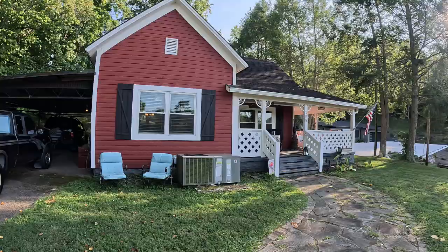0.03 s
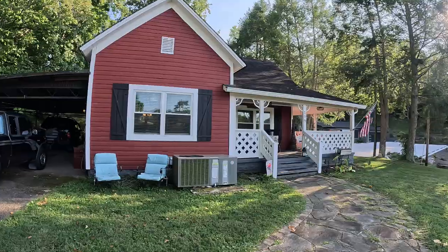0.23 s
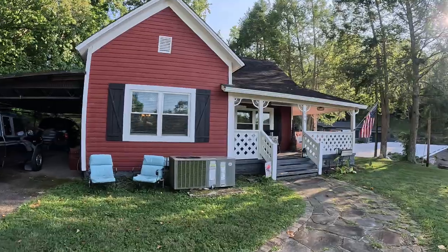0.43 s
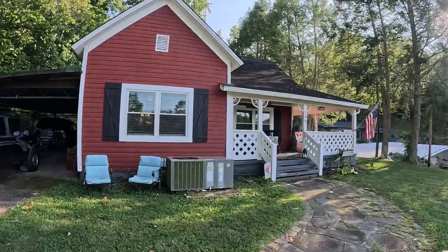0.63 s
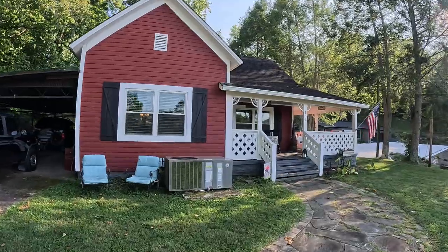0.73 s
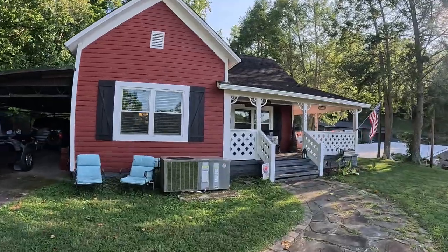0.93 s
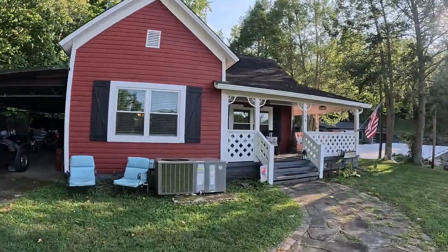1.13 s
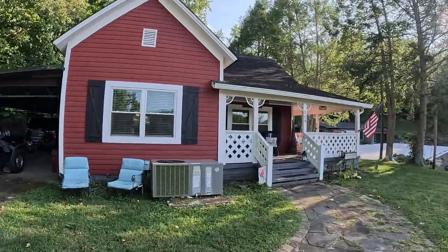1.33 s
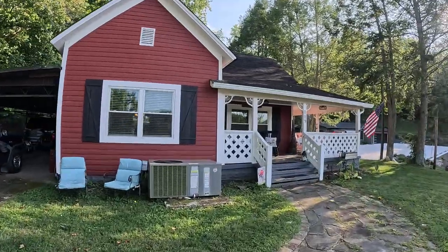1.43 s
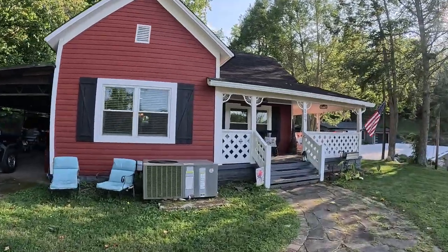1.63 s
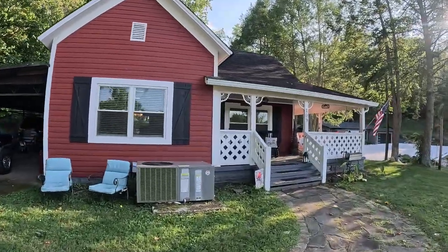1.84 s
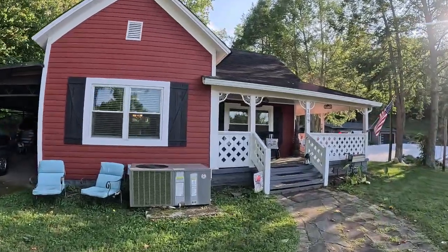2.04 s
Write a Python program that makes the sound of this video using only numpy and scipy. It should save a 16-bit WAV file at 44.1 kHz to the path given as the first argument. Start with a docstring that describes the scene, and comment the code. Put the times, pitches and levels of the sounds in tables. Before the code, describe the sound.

Steady low humming of an air-conditioning unit beside a house, heard in mono from across the lawn: blade drone, turbulent airflow and faint hiss, with soft low puffs of air on the microphone.

```python
"""After a moment of silence, the drone of an outdoor air-conditioning unit fades in, with air rushing around it.
The fan drones at its blade rate, with overtones, and pushes noisy air through the grille and the cabinet.
The compressor hums at twice the mains rate, with faint shaft and casing tones: all of these are sines.
Light air rumbles on the microphone in soft puffs of low noise, and a fine hiss stays steady behind it all."""
import sys
import numpy as np
from scipy import signal
from scipy.fft import rfft, irfft, next_fast_len
from scipy.io import wavfile
from scipy.ndimage import map_coordinates

SR = 44100
rng = np.random.default_rng(int(sys.argv[2]) if len(sys.argv) > 2 else 0)


def pcm_store(signal):
    """Save signal as 16-bit PCM."""
    levels = np.round(np.clip(np.atleast_2d(signal), -1, 1) * 32767)
    wavfile.write(sys.argv[1], SR, levels.astype(np.int16).T)


N = 91551  # length in samples, about 2.08 s
TIME_S = np.arange(N) / SR

BLADE_HZ = 91.1  # how often a fan blade passes
MAINS_HZ = 60.05  # rate of the electric supply


def amp(db):
    """Turn decibels into a gain to multiply by."""
    return 10 ** (np.asarray(db) / 20)


def unit(x):
    """Scale a signal to an average strength (rms) of 1."""
    return x / np.sqrt(np.mean(x ** 2) + 1e-20)


def curves(rows):
    """Draw straight lines between table rows: one curve for each column after the time."""
    times_s, *columns = np.transpose(rows)
    return [np.interp(TIME_S, times_s, column) for column in columns]


def wobble(knots_per_s):
    """Draw a smooth random curve through random points (knots)."""
    knots = rng.standard_normal(256)
    position = TIME_S * knots_per_s + 2
    return map_coordinates(knots, [position], mode="wrap")


def filtered(x, response):
    """Make each frequency louder or softer by the gain that response gives for it."""
    padded = next_fast_len(N + 8192)  # spare room, so the end does not wrap onto the start
    gain = response(np.fft.rfftfreq(padded, 1 / SR))
    return irfft(rfft(x, padded) * gain, padded)[:N]


def noise(spectrum):
    """Random noise of rms 1, coloured by the points of a spectrum table."""
    points_hz, points_db = np.transpose(spectrum)

    def response(hz):
        # the +1 avoids log(0); above the last point the noise is all but silent
        return amp(np.interp(np.log(hz + 1), np.log(points_hz), points_db, right=-120))

    return unit(filtered(rng.standard_normal(N), response))


def tone(pitch_hz, waver_db, drift_rad):
    """A sine of rms 1 whose level wavers and whose phase drifts, both at random."""
    phase = 2 * np.pi * (pitch_hz * TIME_S + rng.random()) + drift_rad * wobble(6.01)
    waver = amp(waver_db * wobble(8.84))
    return unit(waver * np.sin(phase))


# How loud the blade tone is over time: start_s [s], level_db [dB]
DRONE_LEVEL = [(.15, -34), (.27, -40.5), (.37, -30), (.46, -34), (.54, -29), (.61, -31), (.69, -27),
               (.98, -28.5), (1.13, -31), (1.24, -34.5), (1.34, -29.5), (1.45, -44), (1.7, -41),
               (2.05, -43.5)]
# How loud the blade overtones are over time: start_s [s], level_db [dB]
OVERTONE_LEVEL = [(.2, -41), (.5, -42), (.75, -50.5), (1.15, -43), (1.5, -55), (2.05, -47)]
# The mix of blade overtones: multiple [times the blade rate], relative_level_db [dB]
BLADE_OVERTONES = [(2, 1), (3, -3.5), (4, -11.5)]


def fan_drone():
    """Each passing blade pushes the air, giving a tone at the blade rate and less steady overtones."""
    drone_db, = curves(DRONE_LEVEL)
    overtone_db, = curves(OVERTONE_LEVEL)
    overtones = sum(amp(db) * tone(round(multiple) * BLADE_HZ, waver_db=2.0, drift_rad=0.78)
                    for multiple, db in BLADE_OVERTONES)
    drone = tone(BLADE_HZ, waver_db=.5, drift_rad=0.15)
    return amp(drone_db) * drone + amp(overtone_db) * overtones


# How loud the rushing air is over time: start_s [s], body_db [dB], middle_db [dB], treble_db [dB]
RUSH_LEVEL = [(.15, -40, -41, -45), (.24, -47, -49, -49), (.31, -40.5, -42.5, -45.5),
              (.41, -45.5, -42, -44.5), (.53, -44, -45, -42), (.66, -43.5, -45.5, -45),
              (.79, -43, -46, -45), (.95, -47, -47, -48.5), (1.2, -45.5, -50, -47.5),
              (1.42, -46.5, -47.5, -48), (1.6, -46, -48.7, -49.5), (1.8, -43.5, -48, -49.5),
              (1.92, -44.7, -47, -48), (2.06, -43.7, -45, -48)]
# Colour of the body of the rush: pitch_hz [Hz], relative_level_db [dB per Hz]
BODY_SPECTRUM = [(250, -24.5), (430, -7), (560, 0), (720, 0.5), (820, -1.5), (1000, -13.5), (1500, -39.5)]
# Colour of the middle of the rush: pitch_hz [Hz], relative_level_db [dB per Hz]
MIDDLE_SPECTRUM = [(600, -31.5), (850, -5), (1020, -0.5), (1180, -0.5), (1350, -7), (1700, -18.5),
                   (3000, -47.5)]
# Colour of the treble of the rush: pitch_hz [Hz], relative_level_db [dB per Hz]
TREBLE_SPECTRUM = [(900, -38), (1280, -0.5), (1520, 0), (1800, -3), (2030, -5.5), (2350, -11), (3300, -15),
                   (4300, -22.5), (5400, -27.5), (6700, -34), (8200, -34), (10000, -48)]


def grille_rush():
    """Turbulent air rushes out of the grille as three bands of noise, lightly chopped by the blades."""
    body_db, middle_db, treble_db = curves(RUSH_LEVEL)
    bands = [(body_db, BODY_SPECTRUM), (middle_db, MIDDLE_SPECTRUM), (treble_db, TREBLE_SPECTRUM)]
    # each band also flutters a little on its own
    rush = sum(amp(db + .35 * wobble(16)) * noise(spectrum) for db, spectrum in bands)
    chop_depth = .05  # how far the level swings up and down, as a share of the rush
    chop = 1 + chop_depth * np.sin(2 * np.pi * BLADE_HZ * TIME_S)
    return chop * rush


# How loud the cabinet turbulence is over time: start_s [s], level_db [dB]
CHURN_LEVEL = [(.2, -36), (.36, -35), (.56, -33.5), (.7, -35.5), (1.15, -35.5), (1.55, -38.5),
               (2.05, -36.5)]
# Colour of the cabinet turbulence: pitch_hz [Hz], relative_level_db [dB per Hz]
CHURN_SPECTRUM = [(50, -15.5), (85, -1), (140, 0.5), (190, -1.5), (240, -6), (290, -11.5), (380, -14.5),
                  (500, -27), (900, -47.5)]


def cabinet_churn():
    """Low turbulence churns inside the cabinet, made from low-pitched noise."""
    churn_db, = curves(CHURN_LEVEL)
    return amp(churn_db) * noise(CHURN_SPECTRUM)


# How loud the compressor hum is over time: start_s [s], level_db [dB]
HUM_LEVEL = [(.2, -34.5), (.5, -35), (.78, -38.5), (.98, -35.5), (1.18, -41), (1.42, -36.5), (1.72, -41),
             (2.05, -42.5)]
# Compressor shaft and casing tones: pitch_hz [Hz], level_db [dB, rms before following the hum]
CASING_TONES = [(58.3, -42.5), (170, -46.5), (209, -54), (319.7, -56.5), (354, -57), (472, -62.5),
                (780, -63), (959, -61), (1061, -67.5), (2018, -73), (4009, -80), (4133, -81.5)]


def compressor():
    """Magnetic pull hums at twice the mains rate; shaft and casing tones rise and fall with it."""
    hum_db, = curves(HUM_LEVEL)
    hum_gain = amp(hum_db)
    hum = tone(2 * MAINS_HZ, waver_db=0.1, drift_rad=.2)
    casing = sum(amp(db) * tone(pitch_hz, waver_db=1.5, drift_rad=0.87)
                 for pitch_hz, db in CASING_TONES)
    return hum_gain * hum + unit(hum_gain) * casing


# How loud the air on the microphone is over time: start_s [s], level_db [dB]
BREEZE_LEVEL = [(.2, -43), (.42, -44), (.52, -29), (.64, -40.5), (.83, -30), (.94, -39), (1.04, -33),
                (1.2, -38), (1.4, -35), (1.53, -30.5), (1.66, -37.5), (1.75, -33.5), (1.83, -32.5),
                (1.93, -39.5), (2.06, -41)]
# Colour of the air on the microphone: pitch_hz [Hz], relative_level_db [dB per Hz]
RUMBLE_SPECTRUM = [(5, -7), (20, -2), (42, 0), (62, -1), (80, -6), (120, -20), (300, -50)]


def breeze():
    """Light air presses on the microphone and makes soft puffs of low rumble."""
    level_db, = curves(BREEZE_LEVEL)
    return amp(level_db) * noise(RUMBLE_SPECTRUM)


# Colour of the fine hiss: pitch_hz [Hz], relative_level_db [dB per Hz]
HISS_SPECTRUM = [(1800, -8.5), (2800, 6.5), (4000, 5), (5400, -1.5), (6700, -4.5), (8200, -4.5),
                 (9300, -11), (10500, -16.5), (11800, -26), (14000, -26), (15500, -36)]


def fine_hiss():
    """A faint, high-pitched noise that keeps one level throughout."""
    hiss_db = -63.5
    return amp(hiss_db) * noise(HISS_SPECTRUM)


def scene():
    """Add the running unit, the breeze and the hiss together, in mono."""
    unit_sound = fan_drone() + grille_rush() + cabinet_churn() + compressor()
    return (unit_sound + breeze() + fine_hiss())[None]


FADE_START_S, FADE_S, FADE_POWER = 0.098, 0.12, 1.7  # a power above 1 makes the fade start gently
TOP_HZ = 15650  # the sound is cut steeply above this


def record(dry):
    """Fade the sound in from silence, then cut the highest frequencies."""
    fade = np.clip((TIME_S - FADE_START_S) / FADE_S, 0, 1) ** FADE_POWER
    low_pass = signal.butter(16, TOP_HZ, fs=SR, output="sos")
    return signal.sosfilt(low_pass, dry * fade)


dry = scene()
out = record(dry)
pcm_store(out)
```